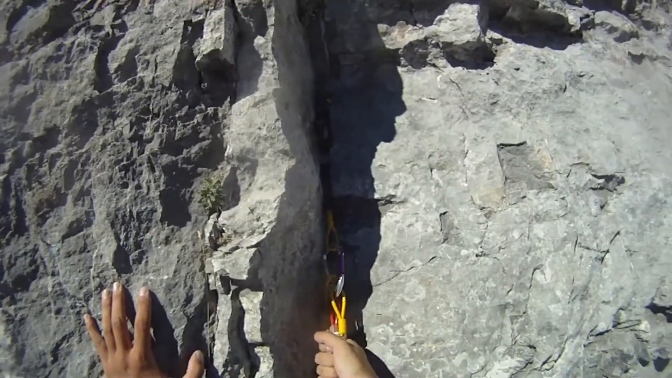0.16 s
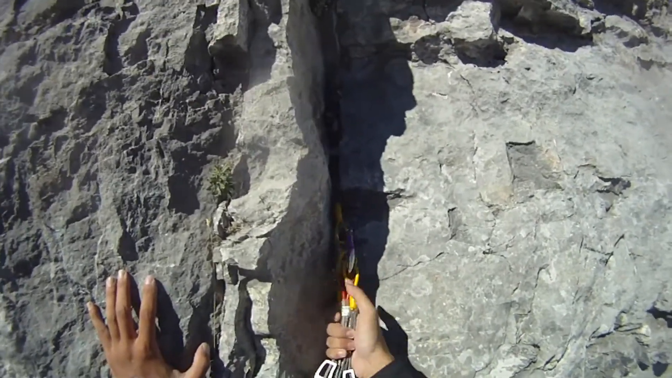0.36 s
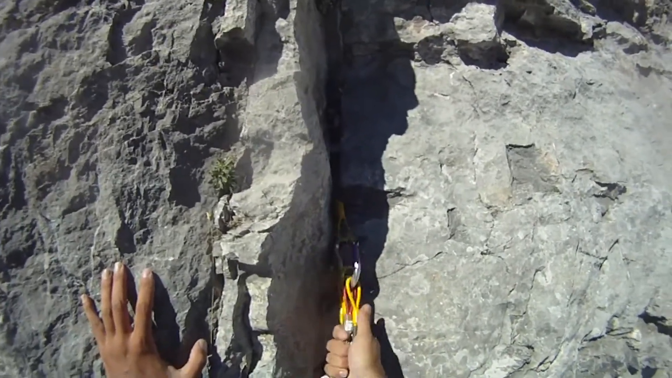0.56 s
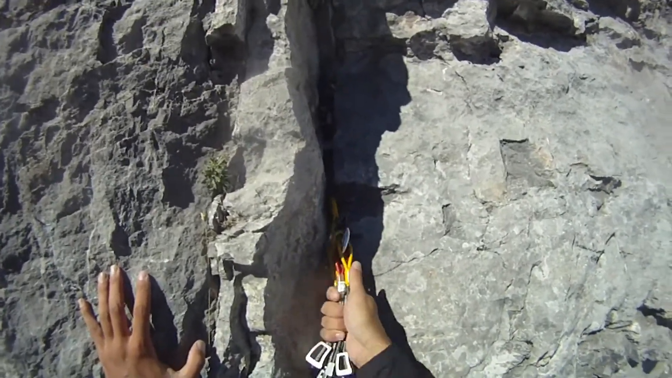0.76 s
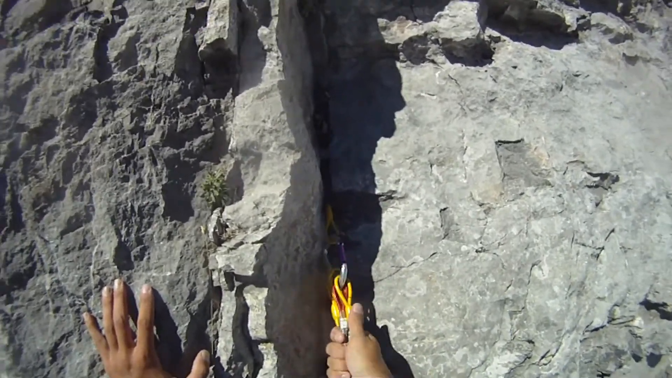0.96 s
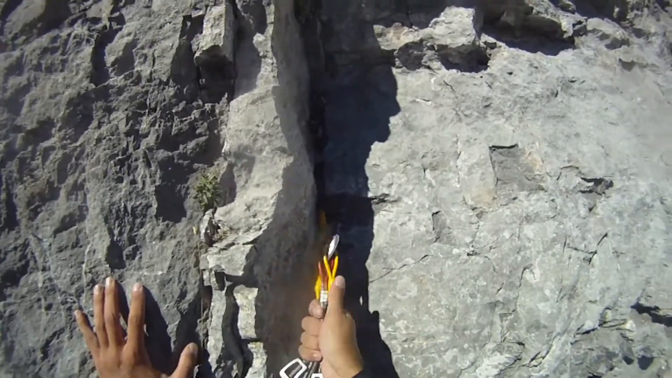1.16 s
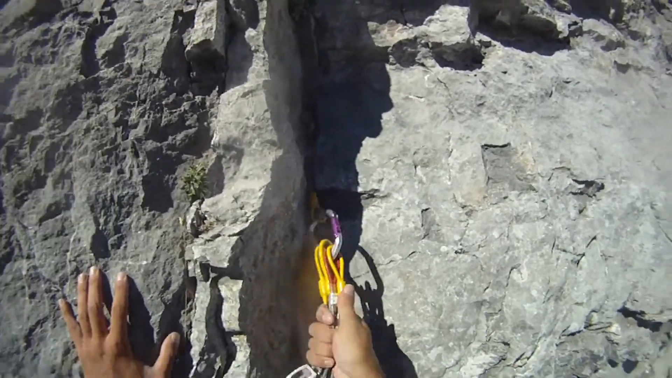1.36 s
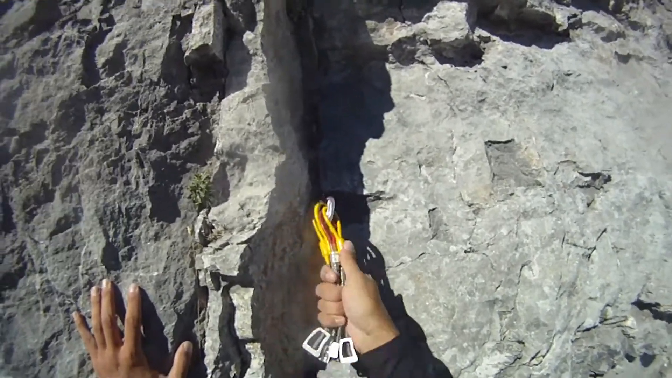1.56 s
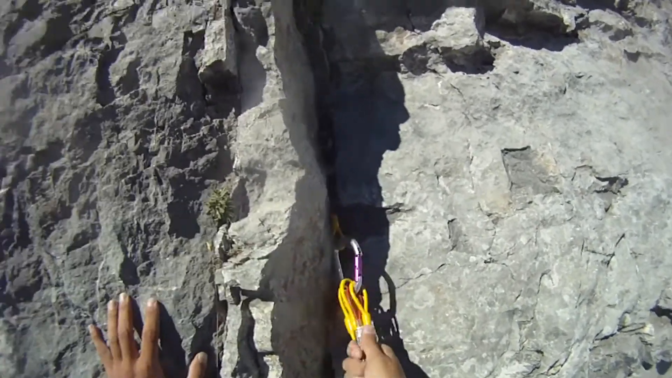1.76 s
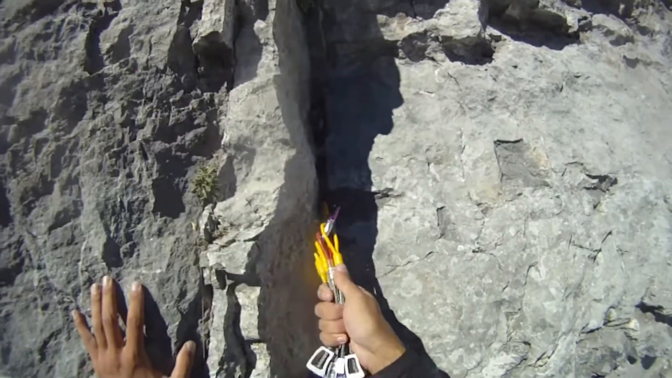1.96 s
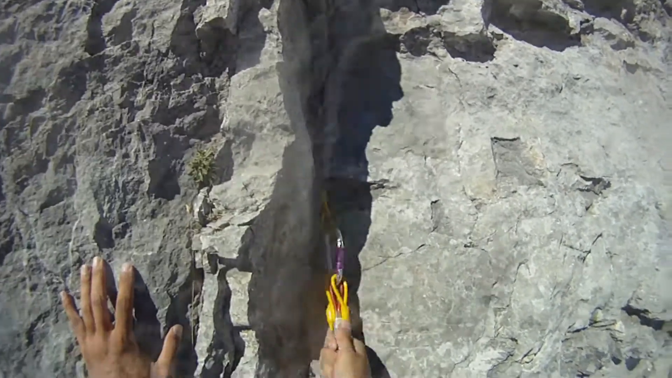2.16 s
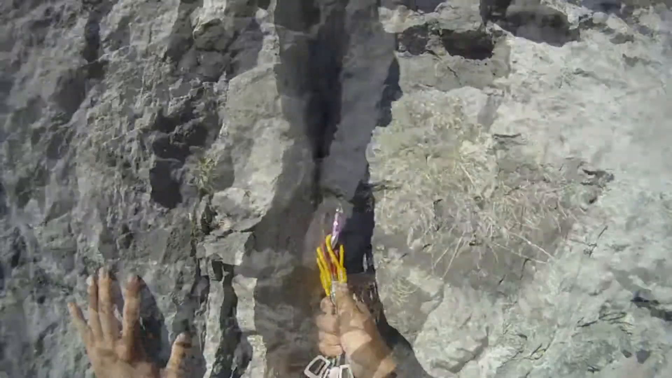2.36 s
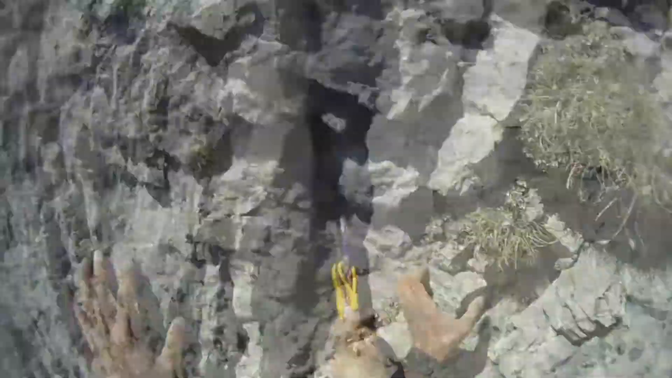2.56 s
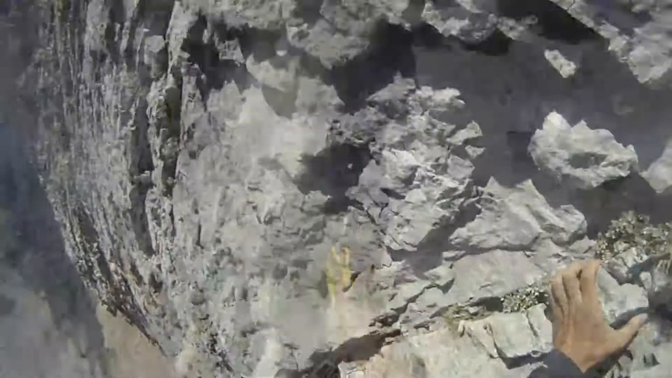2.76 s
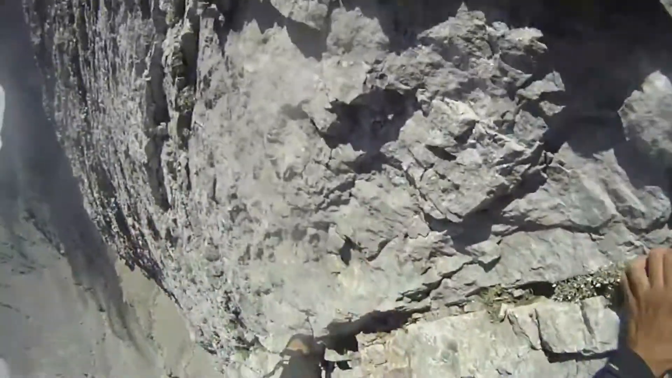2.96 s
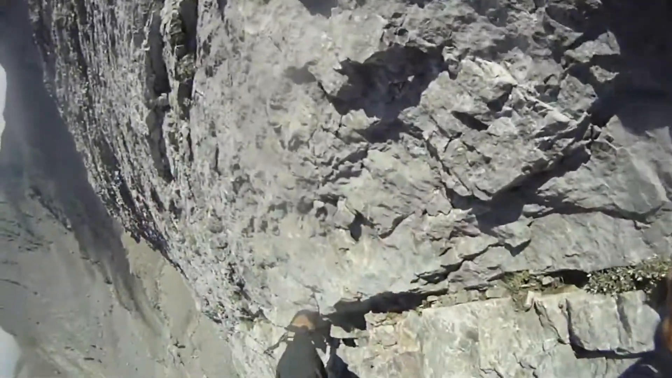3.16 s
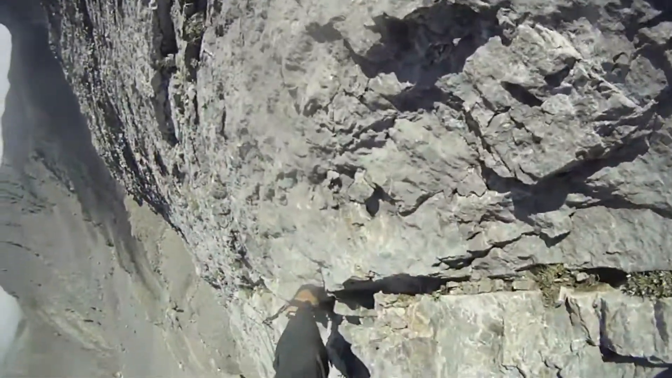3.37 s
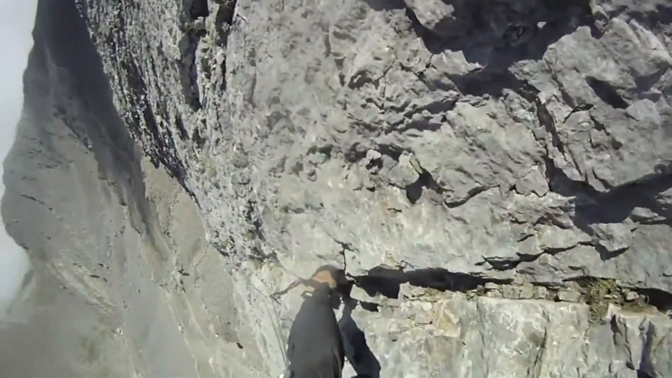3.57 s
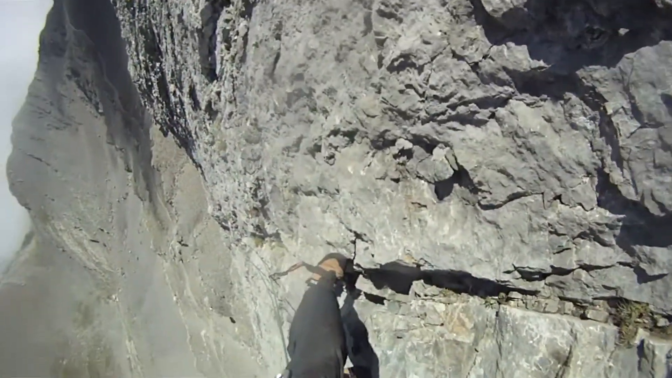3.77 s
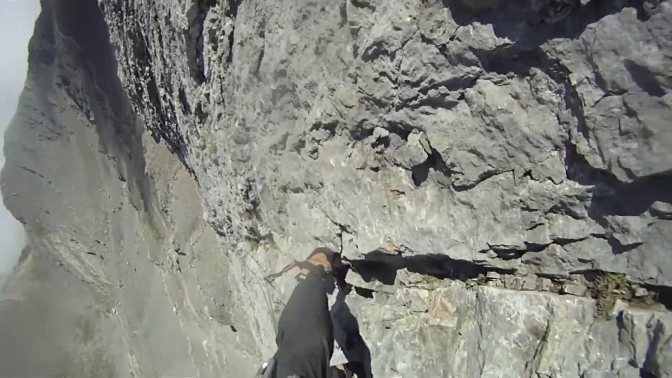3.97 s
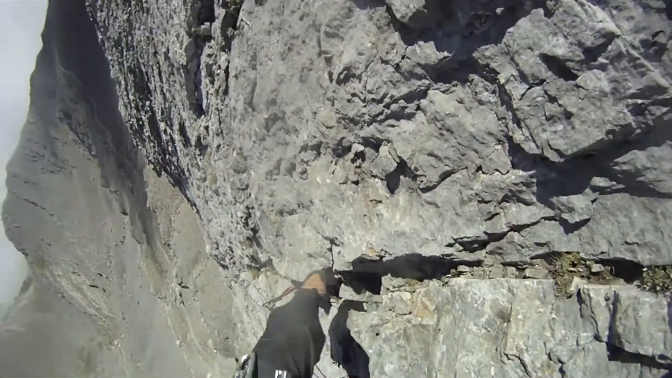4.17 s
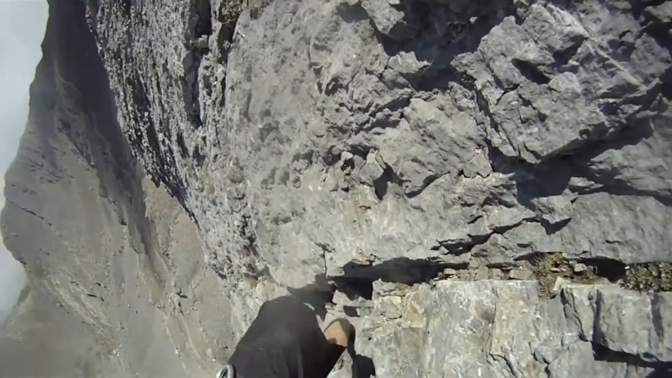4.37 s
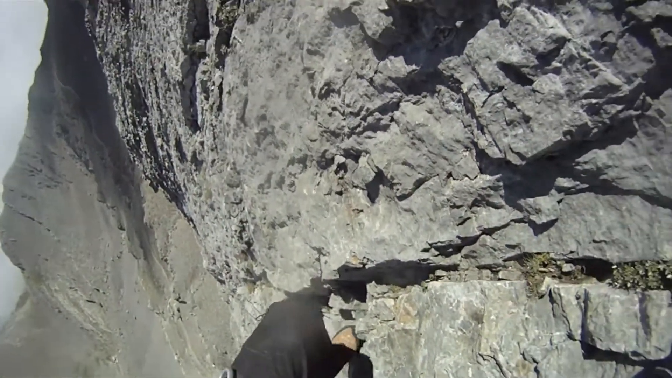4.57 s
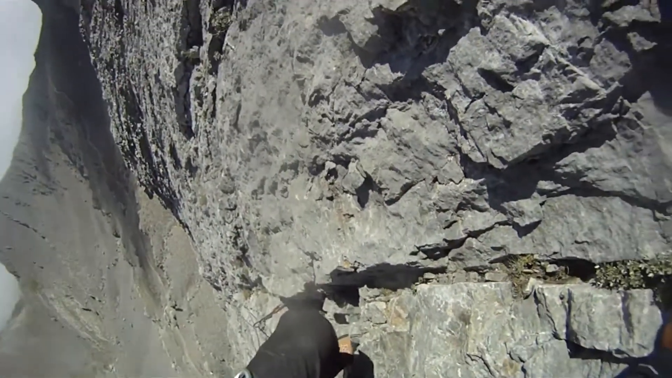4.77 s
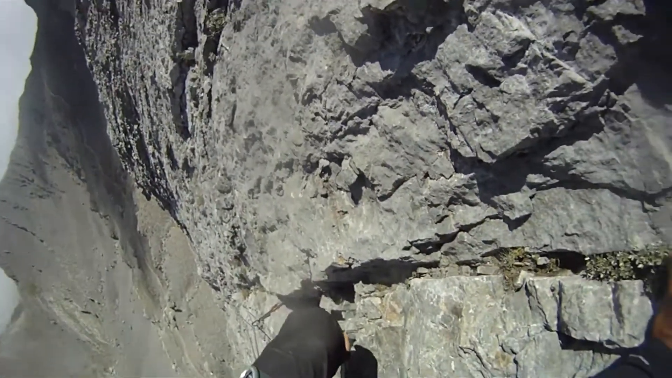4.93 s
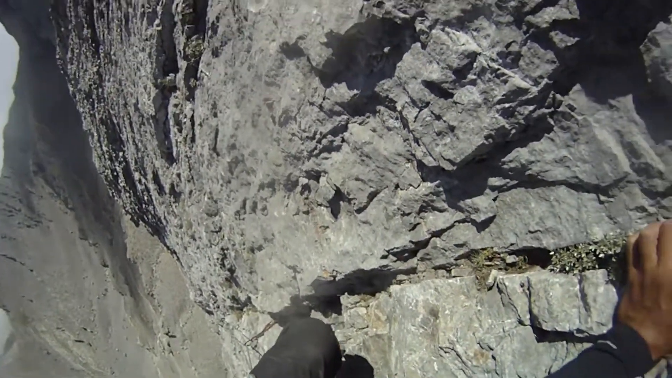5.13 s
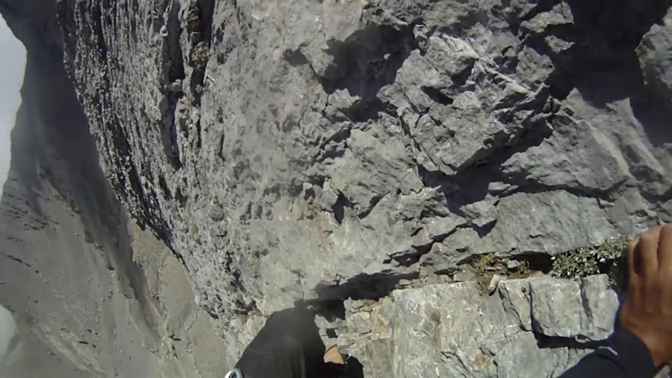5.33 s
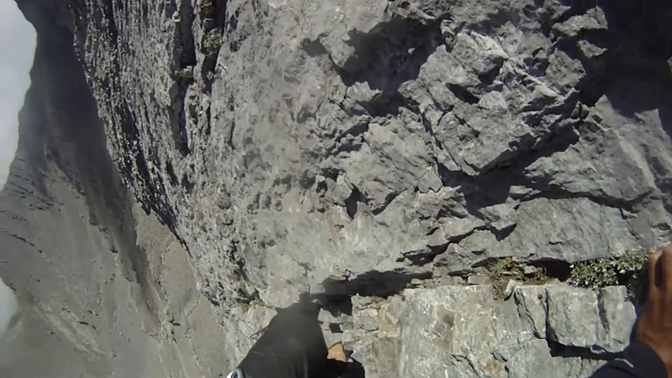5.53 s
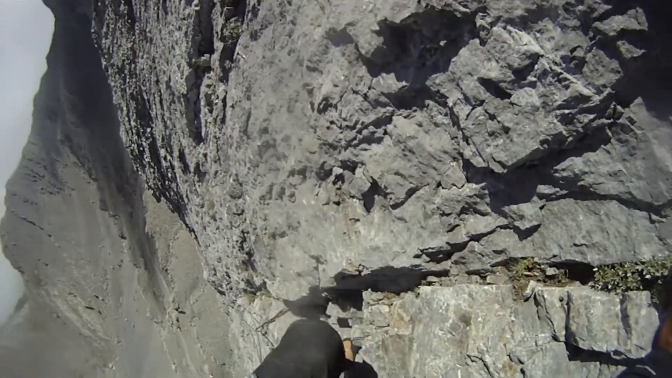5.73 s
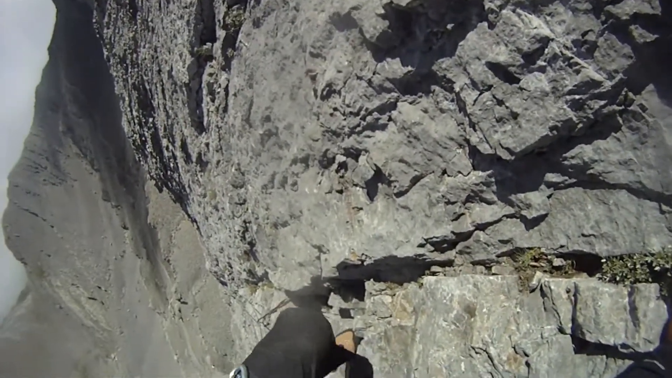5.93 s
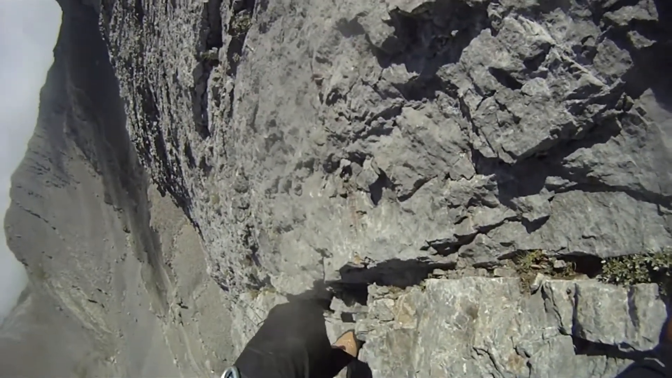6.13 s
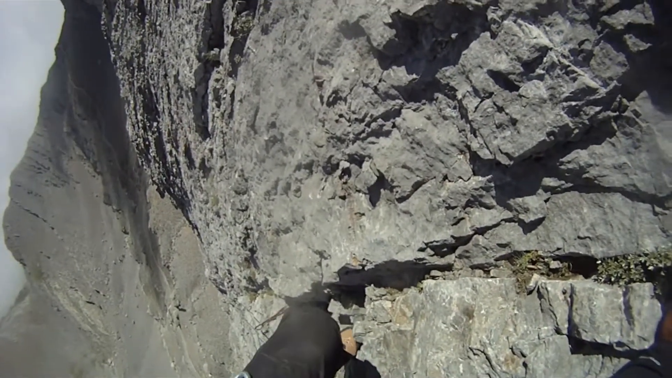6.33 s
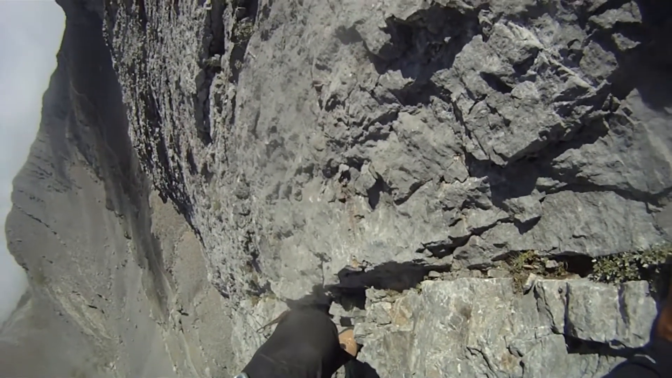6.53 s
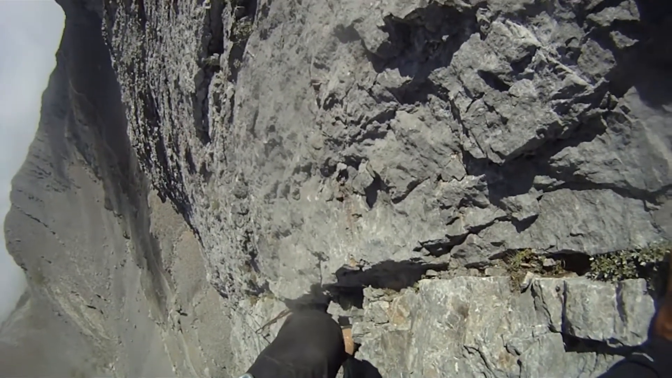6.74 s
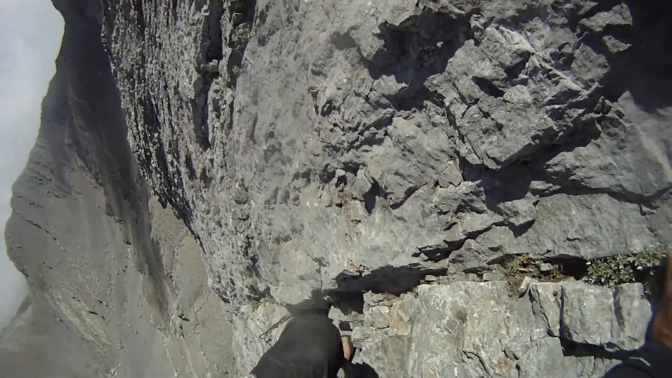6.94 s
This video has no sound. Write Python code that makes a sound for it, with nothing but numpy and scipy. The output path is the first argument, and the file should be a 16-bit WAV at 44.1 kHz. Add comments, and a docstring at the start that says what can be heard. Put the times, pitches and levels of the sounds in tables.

```python
"""A climber tugs seven times on gear set in a crack, heard through a body-worn camera's closed plastic case.
For three seconds carabiners clack in the hand while each pull jolts the camera and rubs the sling, with a
thin sizzle on the hard ones. The sound cuts out for an instant. The climber moves on up with a bump and
sparse clacks, and from about 4.4 s a free carabiner rings. Light wind and hiss lie under it all."""
import sys
import numpy as np
from scipy import signal
from scipy.fft import rfft, irfft, next_fast_len
from scipy.io import wavfile
from scipy.ndimage import uniform_filter1d

SR = 44100
rng = np.random.default_rng(int(sys.argv[2]) if len(sys.argv) > 2 else 0)


def generate_wav(sig):
    """Save sig (samples, or channels by samples) to the path in sys.argv[1] as 16-bit PCM at SR."""
    pcm = np.round(np.clip(np.atleast_2d(sig).T, -1, 1) * 32767).astype(np.int16)
    wavfile.write(sys.argv[1], SR, pcm)


N = 313095
TIME = np.arange(N) / SR
SLACK_WEIGHT_DB, TAUT_WEIGHT_DB = -4, 3.5  # a clack's body near 1 kHz, on a slack and a taut sling
# the arm jerks the sling taut, holds and lets go: start_s, end_s, jerk_db, let_go_db, rub_db
TUGS = [(0.27, 0.37, -47, -58, -76), (0.619, 0.746, -49, -49, -74), (0.956, 1.001, -33, -36, -61),
        (1.314, 1.466, -29, -34.5, -60), (1.757, 1.919, -29.5, -27, -58.5), (2.239, 2.384, -32, -36, -63.5),
        (2.631, 2.681, -40, -42, -84)]


def clack(weight_db, bright_db, heavy_db=0, chatter_t60_s=.022, contact_s=.00053, size=2048):
    """One hand-damped metal knock: the strike and its gritty micro-bounces excite gear and case."""
    # the ring of gear and case together: pitch_hz, level_db, t60_s
    modes = [(1074, -12, 0.021), (1250, -7.5, 0.026), (1572, -16, 0.054), (1963, -4, 0.023),
             (2260, -5, 0.0037), (2566, -11, 0.021), (3075, -6.5, 0.021), (3540, -12.5, 0.021),
             (4065, 4.5, 0.009), (4490, -6, 0.016), (5080, -4, 0.018), (7560, 1, 0.0075), (8180, -5, 0.021),
             (9760, -0.5, 0.0065), (14200, -17, .008)]
    # tone of the bare contact: frequency_hz, level_db
    contact_eq = [(600, -36.5), (1100, -10), (1550, -11), (2250, 3), (2900, -6.5), (3700, 2.5), (5000, -3),
                  (7600, -6.5), (9000, -8.5), (9800, -13.5), (11500, -31), (14400, -10.5), (16000, -25)]
    t = np.arange(size) / SR
    grit = rng.standard_normal(size) * undb(4.5 * rng.standard_normal(size))
    bounces = unit(grit * fade(t, chatter_t60_s))
    strike = unit(rng.standard_normal(size) * fade(t, 12 * contact_s))
    force = (bounces + undb(-3) * strike) * (1 - np.exp(-t / contact_s))  # builds as the parts seat
    ring = np.zeros(size)
    for hz, db, t60 in modes:  # each blow lands on another spot, so the modes vary a little
        gain = undb(db + 3 * rng.standard_normal())
        pitch_hz = hz * (1 + .015 * rng.standard_normal())
        ring += gain * fade(t, t60) * np.sin(2 * np.pi * (pitch_hz * t + rng.random()))
    body = signal.fftconvolve(force, ring)[:size]
    knock = unit(colour(force, contact_eq)) + undb(-4) * unit(body)
    low_db = weight_db + heavy_db  # heavy blows reach the low modes, glancing ones only the high
    tone = [(300, -33), (750, low_db / 2 - 11.5), (980, low_db), (1250, low_db), (1450, weight_db),
            (1750, 2.5), (2800, 2), (4500, bright_db), (10000, bright_db), (15000, bright_db / 2)]
    return unit(colour(knock, tone)) * np.sqrt(SR / 100 / size)  # the energy of 10 ms at rms 1


def gear(shake, gain_db=1.38, rebound_db=-6, taut_above_db=-39.5, heavy_above_db=-39.5):
    """Metal knocks on metal and rock and rebounds once; fuller on a taut sling or a hard blow."""
    # the knocks: start_s, level_db (before gain_db), rebound_after_s, brightness_db
    knocks = [(0.256, -52, .002, -0.5), (0.2925, -53.5, .002, -5), (0.3195, -43, .005, -0.5),
              (0.3786, -53, 0.0054, -4), (0.604, -46, .013, -1), (0.6472, -46.5, .016, -3.5),
              (0.748, -50.5, 0.0017, 0.5), (0.804, -55, 0.012, -6.5), (0.925, -50.5, .003, -4),
              (0.9465, -41, 0.0014, -4.5), (0.9589, -44.5, .002, 3), (0.9965, -52.5, 0.027, -4),
              (1.039, -45, .002, -2.5), (1.2793, -38.5, 0.0085, -2), (1.2946, -43.5, 0.0016, 9),
              (1.323, -41.5, .002, 5), (1.3384, -38.5, .004, 4), (1.348, -34, 0.00204, -0.5),
              (1.3763, -42.5, .004, .5), (1.4436, -39, 0.0067, 2.5), (1.7278, -47, 0.011, -4.5),
              (1.8143, -41, .004, -0.5), (1.832, -58, .003, -4), (1.867, -56, 0.0025, -4),
              (1.8775, -40, 0.0022, -0.5), (2.055, -56, .002, -11.5), (2.2007, -55, 0.011, 3.5),
              (2.262, -53, 0.0018, 11), (2.292, -46, 0.0068, -0.5), (2.3514, -47, .003, 1),
              (2.358, -47.5, .002, 0), (2.5532, -49.5, 0.0025, -1.5), (2.62, -60, 0.0025, 0),
              (2.693, -49.5, 0.0081, -1.5), (2.7511, -53.5, .005, -2), (3.231, -67, 0.0028, -16),
              (3.8946, -57, 0.0071, 7), (4.1272, -64, 0.0035, -12), (4.552, -59, 0.0029, -13),
              (4.597, -62, .003, 12), (4.6575, -59, 0.025, 9), (4.7272, -47.5, 0.0021, 9),
              (4.772, -59, .003, 2), (4.9477, -66.5, .003, 0), (6.9273, -66, .004, -21)]
    out = np.zeros(N)
    taut = np.tanh(shake / undb(taut_above_db))
    for s, db, rebound_s, bright_db in knocks:
        weight_db = SLACK_WEIGHT_DB + (TAUT_WEIGHT_DB - SLACK_WEIGHT_DB) * taut[int(s * SR)]
        heavy_db = 2.5 * max(db - heavy_above_db, 0)
        for lag_s, drop_db in ((0, 0), (rebound_s, rebound_db)):
            add(out, s + lag_s, undb(db + gain_db + drop_db) * clack(weight_db, bright_db, heavy_db))
    return out


def shaking(rise_s=.024, sag_db=-6, let_go_t60_s=.2, settle_db=-19, settle_t60_s=.94):
    """Envelope of the camera's sway: a jolt at each jerk, a sag in the hold, a jolt on letting go."""
    out = np.zeros(N)
    for start, end, jerk_db, let_go_db, _ in TUGS:
        progress = np.clip((TIME - start) / (end - start), 0, 1)
        db = jerk_db + (let_go_db - jerk_db) * progress + sag_db * np.sin(np.pi * progress) ** 2
        pull = held(start, end, rise_s, let_go_t60_s)
        settle = undb(settle_db) * held(start, end, rise_s, settle_t60_s)  # the body sways on
        out += undb(db) * np.maximum(pull, settle)
    return out


def camera_sway(shake):
    """Each pull rocks the camera on its mount with a deep rumble."""
    # tone of the rumble: frequency_hz, level_db
    rumble_eq = [(12, -9.5), (23, 0.5), (34, -2.5), (47, -1), (72, -14.5), (120, -20), (200, -35.5),
                 (330, -44), (700, -68.5)]
    rumble = noise(rumble_eq)
    return rumble / np.sqrt(smooth(rumble ** 2, 1500)) * shake  # levelled, so the arm sets its size


def sling_rub(lag_s=.026, rise_s=.06, t60_s=.17, gain_db=-2, catch_db=4):
    """Sling and sleeve drag in small catches through each tug, a little behind the arm."""
    # tone of the friction: frequency_hz, level_db
    rub_eq = [(600, -20), (1100, 5), (1600, -2), (2250, 3.5), (2900, -9.5), (3600, -4), (5000, -28),
              (8000, -17), (10500, -14), (14500, -24)]
    slide = sum(undb(db) * held(start + lag_s, end + lag_s, rise_s, t60_s) for start, end, *_, db in TUGS)
    return noise(rub_eq) * slide * undb(gain_db + catch_db * walk(250))


def bumps(t60_s=.052):
    """Hand and foot land with dull, quickly damped thumps."""
    # the landings: start_s, level_db, pitch_hz
    thumps = [(0.751, -40, 155), (1.072, -39, 149), (1.347, -39, 212), (1.89, -51, 135), (2.057, -42, 135),
              (2.62, -41.5, 110), (3.94, -43, 173)]
    out, t = np.zeros(N), np.arange(SR // 4) / SR
    for s, db, hz in thumps:
        add(out, s, undb(db) * np.sin(2 * np.pi * hz * t) * fade(t, t60_s))
    return out


def carabiner(contact_s=.00051):
    """A carabiner hanging free is nudged and rings until it touches something again."""
    # the nudges: start_s, level_db, t60_s
    nudges = [(4.448, -64, 0.07), (4.478, -59, 0.26), (4.657, -53.5, 0.22), (4.756, -47.5, 0.049),
              (4.811, -57, 0.039)]
    # its bending modes: pitch_hz, relative_db
    modes = [(3772, 4), (4129, -10), (7870, -18), (8228, -2.5)]
    out, t = np.zeros(N), np.arange(SR // 2) / SR
    for s, db, t60 in nudges:
        ring = sum(undb(mode_db) * np.sin(2 * np.pi * (hz * t + rng.random())) for hz, mode_db in modes)
        add(out, s, undb(db) * ring * fade(t, t60) * (1 - np.exp(-t / contact_s)))
    return out


def jostle(ticks_per_s=24, max_ticks=8, level_db=-62.5, margin_s=.03):
    """The rack jostles in faint chance ticks while the arm pulls."""
    out = np.zeros(N)
    for start, end, *_ in TUGS:
        for k in range(max_ticks):
            s = start - margin_s + (k + rng.random()) / ticks_per_s
            tick = undb(level_db + .5 * rng.standard_normal()) * clack(TAUT_WEIGHT_DB, bright_db=-4)
            if s < end + margin_s:
                add(out, s, tick)
    return out


def sizzle(shake, pitch_hz=12030, width_hz=300, level_db=-75.5, onset_db=-38):
    """A thin, high sizzle sets in whenever the shaking is strong."""
    resonance = signal.iirpeak(pitch_hz, pitch_hz / width_hz, fs=SR)
    thin = signal.lfilter(*resonance, signal.lfilter(*resonance, rng.standard_normal(N)))
    return unit(thin) * np.tanh((shake / undb(onset_db)) ** 2) * undb(level_db)


def wind(gain_db=.5, gust_db=2):
    """Light wind buffets the case in soft, low gusts."""
    # strength of the wind: time_s, level_db (before gain_db)
    strength = [(0, -54), (2.9, -56), (3.7, -54), (4.7, -53), (5.3, -56), (7.1, -55)]
    # tone of the buffeting: frequency_hz, level_db
    wind_eq = [(12, 1.5), (25, 3), (50, -1), (80, -6.5), (130, -12.5), (220, -22.5), (500, -43.5)]
    swell_db = np.interp(TIME, *np.transpose(strength))
    return noise(wind_eq) * undb(swell_db + gain_db + gust_db * walk(9))


def hiss(level_db=-63.17, dip_at_s=2.56, dip_half_s=.22, dip_db=-2.9):
    """An even bed of open air and hiss whose level dips once, briefly."""
    # tone of the bed: frequency_hz, level_db
    air_eq = [(88, -30), (150, -3.5), (294, -5), (850, -12.5), (918, -12.5), (1670, -16.5), (1950, -17),
              (3670, -21.5), (4910, -22.5), (5950, -26.5), (7500, -27.5), (12100, -36.5), (15000, -53)]
    dip = np.exp(-((TIME - dip_at_s) / dip_half_s) ** 2)
    return noise(air_eq) * undb(level_db + dip_db * dip)


def case(x, leak_db=-13):
    """Sound that passes the case wall is notched; a little leaks around it."""
    # the bands the case cancels: centre_hz, width_hz
    notches = [(6020, 1610), (11900, 2030)]
    notched = x
    for hz, width_hz in notches:
        notched = signal.lfilter(*signal.iirnotch(hz, hz / width_hz, fs=SR), notched)
    return notched + undb(leak_db) * (x - notched)


def undb(db):
    """Decibels to gain."""
    return 10 ** (np.asarray(db) / 20)


def unit(x):
    """Scale to rms 1."""
    return x / np.sqrt(np.mean(x ** 2))


def fade(t, t60):
    """Exponential decay, 60 dB down after t60."""
    return np.exp(-np.log(1000) * t / max(t60, 1e-3))


def held(start, end, rise_s, t60):
    """Envelope that swells up to start, holds until end and dies away."""
    return np.exp(-np.maximum(start - TIME, 0) / rise_s) * fade(np.maximum(TIME - end, 0), t60)


def add(out, s, x):
    """Mix x into out from time s on."""
    i = max(int(s * SR), 0)
    out[i:i + len(x)] += x[:max(N - i, 0)]


def gains(points, size):
    """Gain of each frequency bin, from (Hz, dB) points."""
    hz, db = np.transpose(points)
    bin_hz = np.maximum(np.arange(size // 2 + 1) * SR / size, 1)
    return undb(np.interp(np.log(bin_hz), np.log(hz), db))


def colour(x, points):
    """Minimum-phase EQ through (Hz, dB) points, built from the cepstrum."""
    size = len(x)
    cepstrum = irfft(np.log(gains(points, size)), size)
    cepstrum[1:size // 2] *= 2
    cepstrum[size // 2 + 1:] = 0
    return irfft(rfft(x) * np.exp(rfft(cepstrum)), size)


def noise(points):
    """Noise of rms 1, coloured by (Hz, dB) points."""
    size = next_fast_len(N, True)
    return unit(irfft(rfft(rng.standard_normal(size)) * gains(points, size), size)[:N])


def smooth(x, size):
    """Two moving averages of size samples."""
    return uniform_filter1d(uniform_filter1d(x, size), size)


def walk(rate_hz):
    """Smooth random wobble of rms 1."""
    step = int(SR / rate_hz)
    levels = np.repeat(rng.standard_normal(N // step + 1), step)
    return unit(smooth(levels, step)[:N])


def scene():
    """Everything reaches one microphone inside the case; only a faint hiss adds width."""
    shake = shaking()
    metal = gear(shake) + jostle() + carabiner()
    movement = camera_sway(shake) + sling_rub() + bumps()
    mid = case(metal + movement + wind() + hiss()) + sizzle(shake)
    side_eq = [(30, -41), (150, -9.5), (500, -1), (3000, -1), (9000, -6.5), (12000, -62)]
    side = undb(-78.5) * case(noise(side_eq))
    return np.array([mid + side, mid - side])


def record(dry):
    """The sound drops out for an instant, and the top is cut."""
    drop_s, return_s, full_s, top_hz = 3.02, 3.042, 3.055, 15600
    gate = np.where(TIME < drop_s, 1, np.interp(TIME, [return_s, full_s], [.01, 1]))
    return signal.sosfilt(signal.ellip(8, .2, 70, top_hz, fs=SR, output="sos"), dry * gate)


dry = scene()
out = record(dry)
generate_wav(out)
```